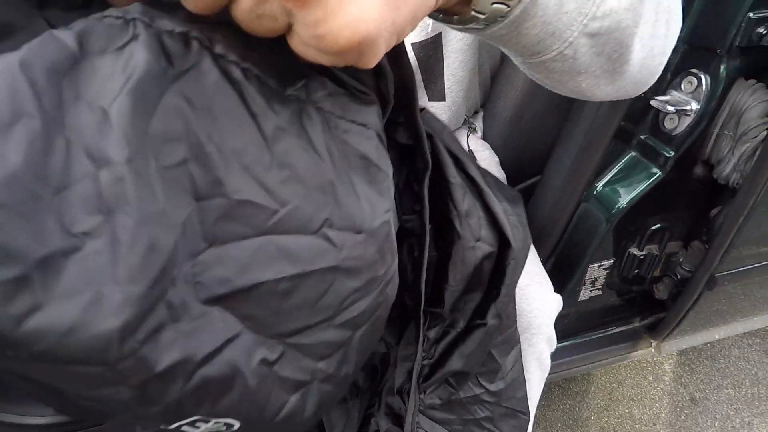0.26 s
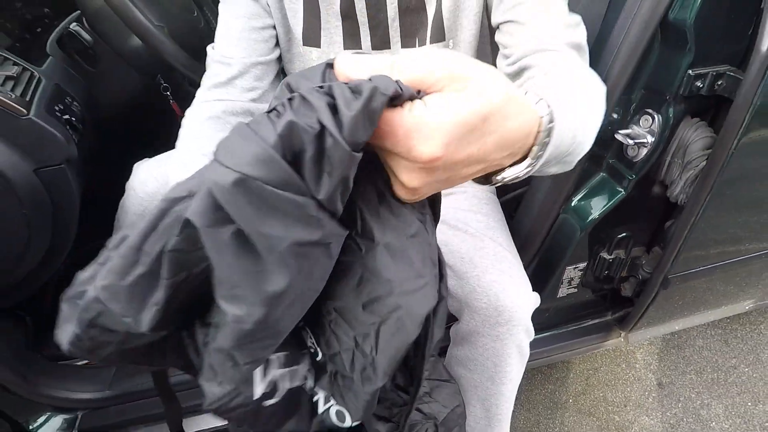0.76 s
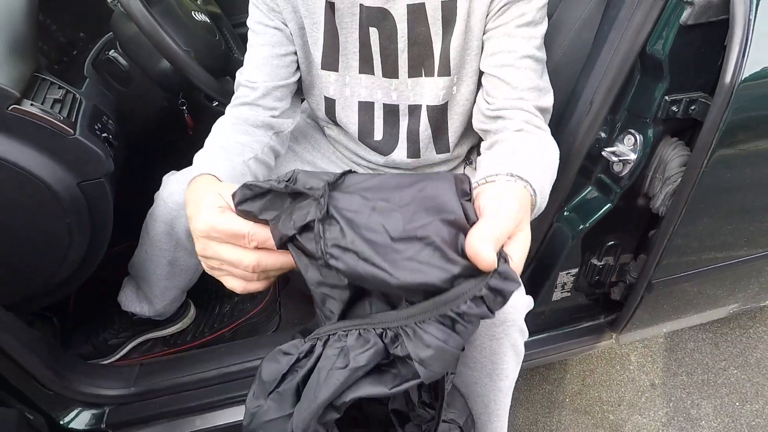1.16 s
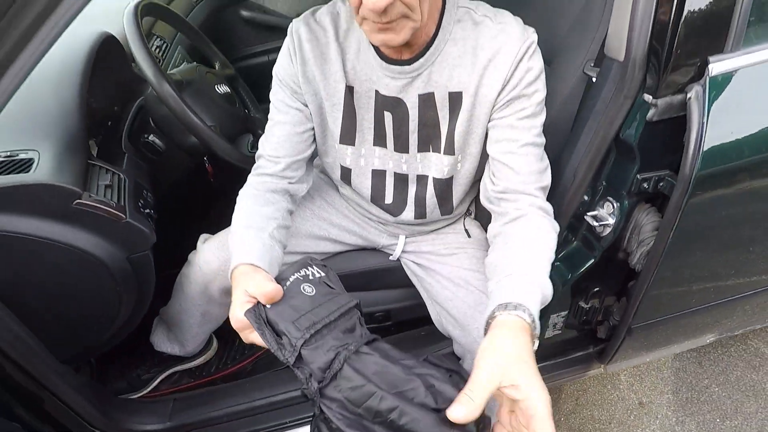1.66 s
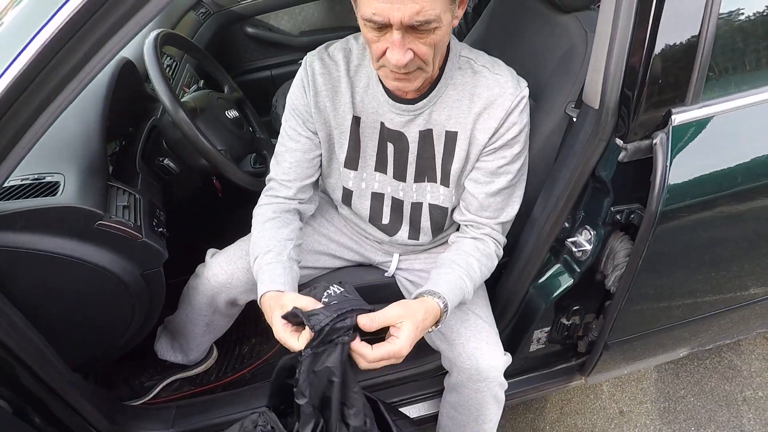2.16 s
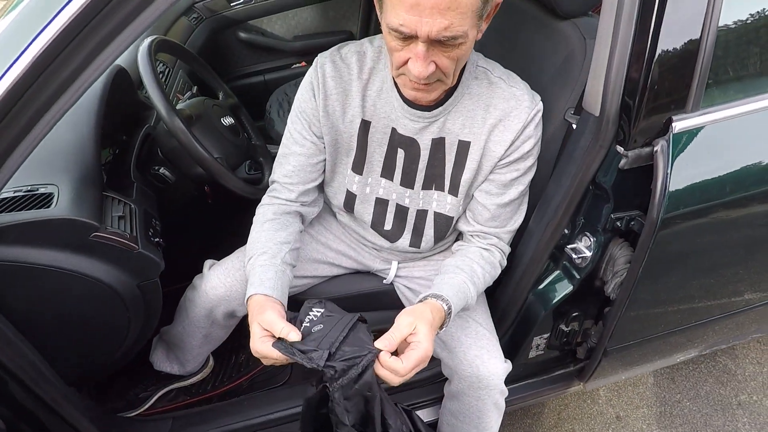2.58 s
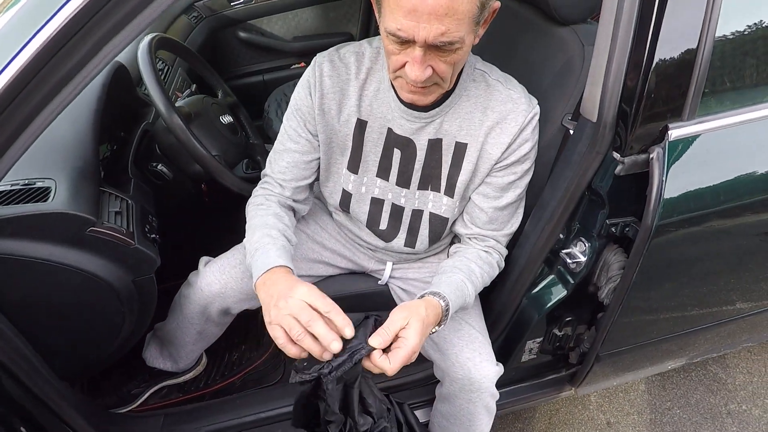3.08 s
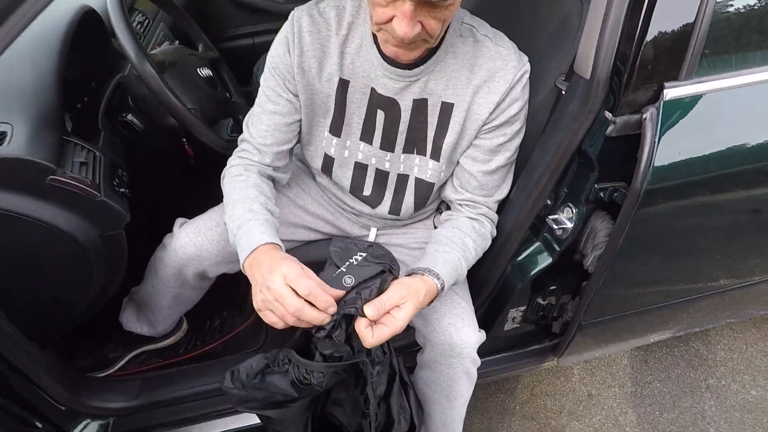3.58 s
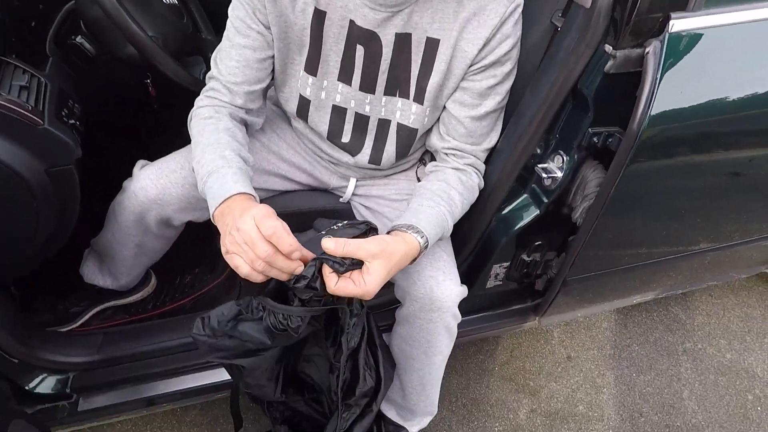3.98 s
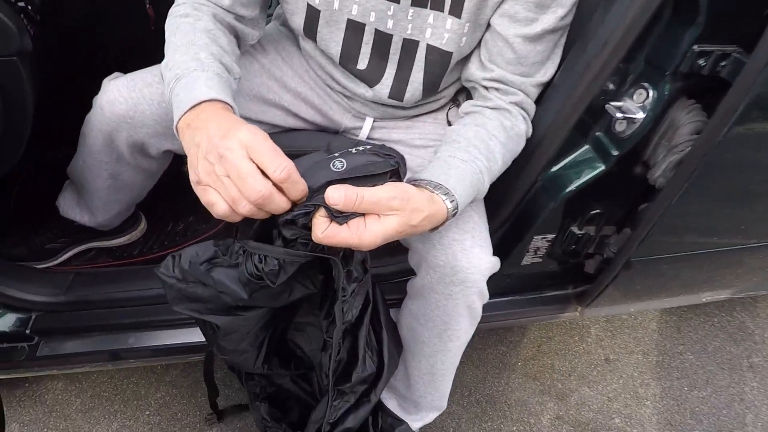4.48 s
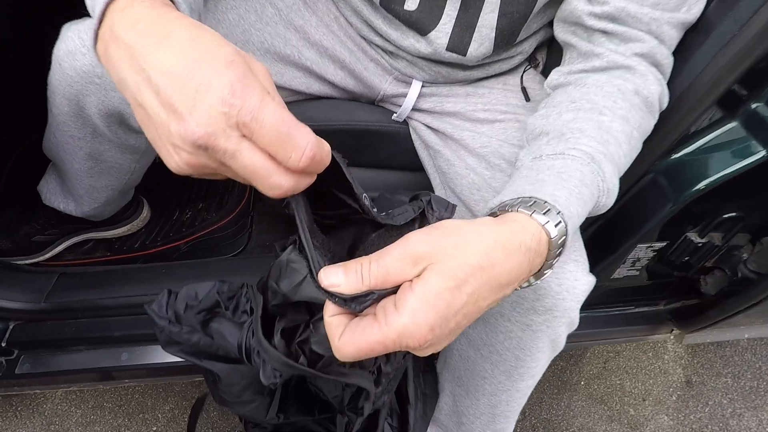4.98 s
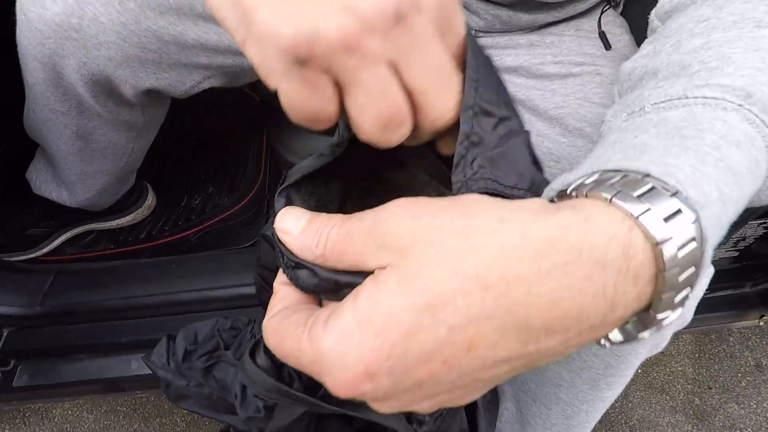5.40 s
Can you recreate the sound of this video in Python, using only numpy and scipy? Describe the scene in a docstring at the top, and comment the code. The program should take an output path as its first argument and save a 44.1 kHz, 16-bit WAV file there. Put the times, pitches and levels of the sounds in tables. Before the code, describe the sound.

Thin crinkly fabric is handled in quick strokes beside a parked car, with a brief zippy scrape, later plastic rasps and soft wind buffeting.

```python
"""At the open door of a parked car, a stiff nylon bag is folded and stuffed into its pouch, close to a camera.
Sliding cloth swishes as filtered friction noise with crackling grains, and its creases snap as damped modes.
Once the weave zips through a hand: a tone at the rate of its ribs. Later something catches and drags on the
camera's housing, as volleys of slips filtered by the shell's modes. Light wind rumbles and puffs on the
microphone, as slow noise and short fluttering swings of pressure, over a steady outdoor background."""
import sys
import numpy as np
from scipy.fft import rfft, irfft, next_fast_len
from scipy.io import wavfile
from scipy.ndimage import uniform_filter1d, map_coordinates

SR = 44100
rng = np.random.default_rng(int(sys.argv[2]) if len(sys.argv) > 2 else 0)


def generate_wav(sig):
    """Save sig (samples, or channels by samples) to the path in sys.argv[1] as 16-bit PCM at SR."""
    pcm = np.round(np.clip(np.atleast_2d(sig).T, -1, 1) * 32767).astype(np.int16)
    wavfile.write(sys.argv[1], SR, pcm)


N = 248794


def amp(db):
    """Logarithmic level: decibels to amplitude gain."""
    return 10 ** (np.asarray(db) / 20)


def unit(x):
    """Normalisation of mean power: scale to rms 1."""
    return x / np.sqrt(np.mean(x ** 2) + 1e-20)


def curves(rows):
    """Linear interpolation: one value per sample for each column after the time."""
    s, *cols = np.transpose(rows)
    return [np.interp(np.arange(N) / SR, s, c) for c in cols]


def during(rows):
    """Gating: open over the time span of a table, with edges softened by a moving average."""
    t = np.arange(N) / SR
    is_open = 1. * ((t > rows[0][0]) & (t < rows[-1][0]))
    return uniform_filter1d(is_open, size=200)


def wobble(rate):
    """Random modulation: a smooth curve through normal deviates, rate knots a second."""
    knots = rng.standard_normal(int(N * rate / SR) + 4)
    return map_coordinates(knots, [np.arange(N) * rate / SR])


def filtered(x, response):
    """Linear filtering: the spectrum of x times a complex response of frequency."""
    m = 2 * next_fast_len(len(x) // 2 + 4096)  # even length, padded for the filter's tail
    spectrum = rfft(x, m) * response(np.fft.rfftfreq(m, 1 / SR))
    return irfft(spectrum, m)[:len(x)]


def colour(x, points):
    """Minimum-phase filtering: a causal filter whose gain follows (f/Hz, level/dB) points."""
    f, db = np.transpose(points)

    def response(hz):
        cepstrum = irfft(np.log(amp(np.interp(np.log(hz + 1), np.log(f), db))))
        # folding the cepstrum onto positive time makes the filter causal
        cepstrum[1:len(hz) - 1] *= 2
        cepstrum[len(hz):] = 0
        return np.exp(rfft(cepstrum))
    return filtered(x, response)


def resonance(f, hz, width):
    """Damped oscillator: response of one mode, with gain 1 at its resonance."""
    return 1j * f * width / (hz * hz - f * f + 1j * f * width)


def grains(rate, spread_db):
    """Random point process: impulses, rate per second on average, of scattered size and sign, rms 1."""
    scatter_db = spread_db * np.clip(rng.standard_normal(N), -2, 2)
    sizes = amp(scatter_db) * np.sign(rng.standard_normal(N))
    return unit(sizes * (rng.random(N) < rate / SR))


def add(track, s, sound):
    """Superposition: mix a sound into a track at time s."""
    part = track[round(s * SR):][:len(sound)]
    part += sound[:len(part)]


def gesture(start, length, attack, release):
    """Exponential growth and decay: rises to its start, holds, dies away; attack, release in s per 20 dB."""
    t = np.arange(N) / SR - start
    before, after = np.maximum(-t, 0), np.maximum(t - length, 0)
    return np.exp(-np.log(10) * np.minimum(before / attack + after / release, 10))


# Hand strokes that slide cloth over cloth: start t/s, length t/s, mid-stroke level/dB,
# swell from start to end level/dB
STROKES = [(0, 0.18, -43, -11.5), (0.257, 0.095, -36.5, -0.5), (0.357, 0.091, -31, -1),
           (0.458, 0.12, -41, 1), (0.603, .18, -42, 3.5), (0.792, 0.3, -40, -3.5), (1.112, 0.18, -43, 8),
           (1.33, 0.073, -43, -7.5), (1.427, .26, -49.5, 4.5), (1.734, 0.17, -55.5, -4),
           (1.898, 0.17, -45.5, 2.5), (2.164, 0.068, -47, -0.5), (2.325, 0.33, -50.5, -6.5),
           (2.812, 0.029, -56.5, 7), (3.028, .1, -54, 2.5), (3.197, .12, -51.5, -11),
           (3.361, 0.14, -47, 0.5), (3.626, 0.28, -50, 1.5), (3.966, 0.046, -49.5, -4),
           (4.08, .21, -52.5, 6), (4.45, 0.18, -50, 10), (4.736, 0.064, -43.5, -7), (4.957, 0.042, -50, -1),
           (5.05, 0.346, -44.5, 4), (5.446, 0.21, -42, 6)]
STROKE_ATTACK_S, STROKE_RELEASE_S = .048, .09  # s per 20 dB


def sliding():
    """Power summation: the sliding effort adds the squares of all strokes, each swelling or fading."""
    t, power = np.arange(N) / SR, np.zeros(N)
    for start, length, db, swell_db in STROKES:
        progress = np.clip((t - start) / length, 0, 1) - .5
        envelope = gesture(start, length, STROKE_ATTACK_S, STROKE_RELEASE_S)
        power += (amp(db + swell_db * progress) * envelope) ** 2
    return np.sqrt(power)


# Gain of the treble, as the hiss brightens and dulls over time: t/s, level/dB
TREBLE_GAIN = [(0, -7.5), (.45, -2), (.85, -3.5), (1.3, 1), (2.8, 0), (5.1, 1), (5.6, -5)]
# Relative spectrum of rubbing threads: f/Hz, level/dB
HISS_SPECTRUM = [(1000, -33), (1900, -13.5), (2500, -3.5), (3100, -2.5), (3700, 0.5), (4200, -3),
                 (5000, -6), (6000, -8), (7200, -4.5), (8000, -9.5), (9000, -11), (10500, -18.5),
                 (12000, -28.5), (15500, -33)]
# Relative spectrum of the hollow bag, shared by the outdoor background: f/Hz, level/dB
BODY_SPECTRUM = [(150, -5.5), (300, 3), (600, 2.5), (900, 0), (1250, 0.5), (1900, -4.5), (2600, -8.5),
                 (5000, -50), (10000, -100)]
# hollow sound against the effort, and the steady level of the outdoor background (dB)
BODY_DB, AMBIENT_DB = -2.5, -51.5
# small creases that tick at random: rate per second, rms against the rubbing before it is filtered (dB)
TICK_RATE, TICK_DB = 14, -8


def swish():
    """Friction noise: threads hiss, tiny creases crackle in clumps; the bag's hollow sound joins the background."""
    effort = sliding()
    treble_db, = curves(TREBLE_GAIN)
    crackle = unit(grains(rate=1100, spread_db=6) * amp(2.5 * wobble(60)))
    rubbing = unit(rng.standard_normal(N) + 0.18 * crackle) * amp(1.33 * wobble(60))
    ticks = amp(TICK_DB) * grains(rate=TICK_RATE, spread_db=3)
    hiss = unit(colour(rubbing + ticks, HISS_SPECTRUM))
    treble = filtered(hiss, lambda f: 1 / (1 + (4600 / (f + 1)) ** 8))  # above about 4600 Hz
    hiss = hiss + (amp(treble_db) - 1) * treble
    body = unit(colour(rng.standard_normal(N) + 0.99 * crackle, BODY_SPECTRUM))
    body_level = np.hypot(amp(BODY_DB) * effort, amp(AMBIENT_DB))
    return effort * hiss + body_level * body


# Creases that buckle and folds that flap: t/s, peak level/dB before a common 4.5 dB cut, f/Hz,
# 60 dB decay of the driving noise t/s
SNAPS = [(0.2291, -16.5, 1030, 0.012), (.363, -12.5, 438, 0.09), (.384, -14.5, 1000, 0.024),
         (0.4175, -2, 4300, 0.0082), (.4429, -6.5, 3080, 0.014), (0.5628, -15, 4800, 0.011),
         (0.742, -17.5, 1200, 0.014), (.802, -19, 1390, 0.022), (0.83, -16, 930, 0.021),
         (.993, -21, 1900, .012), (1.295, -11, 2620, 0.019), (1.317, -20, 1190, 0.062),
         (1.391, -20.5, 1550, .02), (2.135, -22, 1350, 0.03), (2.181, -23.5, 2370, .02),
         (3.889, -20.5, 2140, 0.05), (3.981, -27, 546, 0.03), (4.221, -24.5, 1390, 0.026),
         (5.117, -21.5, 1680, 0.021), (5.447, -22.5, 2950, .015), (5.563, -17, 2940, .025)]
SNAP_WIDTH = 1.2  # bandwidth of each resonance, as a multiple of its pitch


def snaps():
    """Impulsive excitation of a damped mode: a crease flips with a crack and shakes a small panel of cloth."""
    out, t = np.zeros(N), np.arange(SR // 10) / SR
    for s, db, hz, t60 in SNAPS:
        flutter = rng.standard_normal(len(t)) * amp(-60 * t / t60)
        # the mode acts twice; the treble rolls off near 9500 Hz
        snap = filtered(flutter, lambda f: resonance(f, hz, SNAP_WIDTH * hz) ** 2 / (1 + (f / 9500) ** 8))
        add(out, s, amp(db - 4.5) * snap / np.abs(snap).max())
    return out


# Ribs of the weave passing the hand: t/s, mean rib rate f/Hz, level/dB before a common 2 dB cut
RIBS = [(.44, 1742, -41), (.452, 1710, -35), (.461, 2380, -32), (.479, 2317, -29.5), (.495, 1816, -38),
        (.506, 1515, -35), (.518, 1150, -34), (.535, 757, -39), (.56, 507, -62)]


def weave_zip():
    """Periodic excitation: ribs sing unevenly at the sliding speed, which falls as the pull ends."""
    rib_hz, db = curves(RIBS)
    uneven_hz = rib_hz * (1 + .11 * wobble(1500))
    phase = 2 * np.pi * np.cumsum(uneven_hz) / SR
    level = amp(db - 2 + 2.7 * wobble(260))
    return during(RIBS) * level * unit(np.sin(phase) + 0.26 * np.sin(2 * phase))


# Modes of the plastic shell: f/Hz, bandwidth f/Hz, level/dB
SHELL_MODES = [(424, 12, -15), (483, 30, -9.5), (632, 77, -0.5), (720, 19, 2), (880, 78, -9.5),
               (1104, 64, -2.5), (1380, 23, 2.5), (1820, 68, -2.5), (2360, 40, 2), (2750, 28, -7),
               (3040, 14, 6), (3295, 150, -4.5), (3840, 31, -2), (4220, 120, -20), (7180, 400, -16),
               (8300, 350, -26)]
# Relative spectrum of rasping slips: f/Hz, level/dB
RASP_SPECTRUM = [(900, -38.5), (2000, -8), (2900, -3), (3500, 3), (4100, 3), (5000, -1.5), (6000, -1.5),
                 (7300, -0.5), (8700, -4), (10000, -16), (12000, -24), (15000, -26), (16000, -33)]
# Relative spectrum of knocks on the shell: f/Hz, level/dB
KNOCK_SPECTRUM = [(100, -8), (250, 5.5), (450, 0), (650, -1), (820, -5.5), (1250, 0), (1900, -6.5),
                  (2700, -7), (6000, -57), (12000, -52)]


def housing(x, spectrum):
    """Modal superposition: slips heard through the camera's plastic shell, directly and by its modes."""
    def shell(f):
        return .6 + sum(amp(db) * resonance(f, hz, width) for hz, width, db in SHELL_MODES)
    return colour(filtered(x, shell), spectrum)


# Short catches on the housing: t/s, rasp peak level/dB before a common 3 dB cut,
# knock rms against the rasp's level/dB before a common 4 dB boost
CATCHES = [(4.566, -16, -13), (4.588, -19, -16), (4.6, -13.5, -9), (4.62, -13.5, -10.5), (4.633, -19, -1),
           (4.654, -26, -5), (4.745, -7, -12), (4.753, -20.5, -2), (4.8127, -9, -9), (4.82, -11, -20),
           (4.833, -7, -15), (4.84, -11.5, -12), (4.864, -9.5, -4.5), (4.875, -8.5, -9), (4.918, -14, -2),
           (4.95, -25, 4), (5.288, -18.5, 3), (5.295, -15.5, 8.5), (5.31, -18.5, 4), (5.3215, -12.5, 2),
           (5.339, -14.5, -9), (5.612, -18, 0.5)]
CATCH_RISE_S, CATCH_T60_S = .009, 0.027  # build-up and decay, s per 60 dB


def catches():
    """Stress release: each catch builds up briefly, then lets go in a dying volley of tiny slips."""
    out, t = np.zeros(N), np.arange(SR // 10) / SR - .02  # room for the build-up before t = 0
    slips = grains(rate=7000, spread_db=4)
    strength = amp(np.minimum(60 * t / CATCH_RISE_S, -60 * t / CATCH_T60_S))
    for s, db, knock_db in CATCHES:
        volley = np.roll(slips, -round(s * SR))[:len(t)] * strength
        rasp = unit(housing(volley, RASP_SPECTRUM))
        knock = unit(housing(volley, KNOCK_SPECTRUM))
        catch = rasp + amp(knock_db + 4) * knock
        # the strength peaks about 1 ms after the listed time
        add(out, s + t[0] + 0.000983, amp(db - 3.0) * catch / np.abs(rasp).max())
    return out


# Drags across the housing: start t/s, length t/s, rasp level/dB, knock level/dB
DRAGS = [(4.81, 0.043, -29.5, -54), (4.861, 0.01, -17.5, -24.5), (4.884, 0.046, -25, -21),
         (4.935, .018, -36, -34), (5.056, 0.021, -40, -41.5), (5.145, .03, -36, -57),
         (5.289, 0.046, -30.5, -30.5), (5.598, 0.03, -40, -47)]
DRAG_ATTACK_S, DRAG_RELEASE_S = 0.008, 0.016  # bite and letting go, s per 20 dB


def drags():
    """Stick-slip friction at an uneven rate: fine and coarse slips rasp, coarse ones knock the shell."""
    coarse = grains(rate=900, spread_db=3)
    fine = grains(rate=3500, spread_db=4)
    rasp = unit(housing(coarse + 2.8 * fine, RASP_SPECTRUM))
    knock = unit(housing(coarse, KNOCK_SPECTRUM))
    # the contact tightens and slackens
    grip = unit(amp(1.8 * wobble(220)))
    out = np.zeros(N)
    for start, length, rasp_db, knock_db in DRAGS:
        contact = amp(rasp_db) * rasp + amp(knock_db) * knock
        out += gesture(start, length, DRAG_ATTACK_S, DRAG_RELEASE_S) * contact
    return grip * out


# Puffs of air that flutter in the port: t/s at the middle, gain level/dB, nominal flutter f/Hz
PUFFS = [(.37, -17, 215), (0.85, -29.5, 202.4), (3.59, -33, 160), (3.634, -19, 101.6), (3.988, -17, 190),
         (4.44, -16.5, 150), (4.475, -22, 200), (4.521, -21, 189.6), (4.544, -13.5, 126.4),
         (4.789, -16.5, 91.3), (4.974, -21.5, 189.6), (4.997, -12.5, 124.6), (5.032, -23, 106),
         (5.261, -21.5, 128), (5.616, -21, 129.2)]
# spread of the swell (s, standard deviation), and the slower push under it (Hz, dB re flutter)
PUFF_HALF_S, PUSH_HZ, PUSH_DB = .009, 75.4, -2


def puffs():
    """Vortex passage: an eddy swells with uneven swings of pressure, riding on a slower push of air."""
    out, t = np.zeros(N), np.arange(SR // 5) / SR - .1
    swell = np.exp(-.5 * (t / PUFF_HALF_S) ** 2)
    for s, db, hz in PUFFS:
        # the pitch wavers and falls as the eddy passes
        rate = hz * np.exp(.25 * np.tanh(wobble(220)[:len(t)]) - .18 * np.tanh(t / PUFF_HALF_S))
        phase = 2 * np.pi * (np.cumsum(rate) / SR + rng.random())
        flutter = np.sin(phase) + .14 * np.sin(2 * phase)
        push = amp(PUSH_DB) * np.sin(2 * np.pi * (PUSH_HZ * t + rng.random()))
        add(out, s + t[0], amp(db) * (swell * flutter + np.sqrt(swell) * push))
    return out


def buffeting(spectrum, steady_s):
    """Turbulence noise: low noise whose strength stays even over spans longer than steady_s."""
    x = colour(rng.standard_normal(N), spectrum)
    return x / np.sqrt(np.abs(uniform_filter1d(x * x, int(steady_s * SR))) + 1e-12)


# Strength of the wind at the port: t/s, rumble level/dB before gusting and a common 1 dB boost
WIND = [(0.0, -17.5), (0.28, -24), (0.36, -20.0), (0.52, -26), (1.04, -25), (1.16, -24), (1.36, -29.5),
        (1.56, -25), (3.23, -27), (3.31, -25), (4.23, -21), (4.31, -27.5), (4.43, -19.5), (5.03, -24.5),
        (5.11, -26.5), (5.47, -20), (5.55, -29), (5.63, -23.5)]
# Relative spectrum of the slow pressure swings: f/Hz, level/dB
RUMBLE_SPECTRUM = [(8, -9.5), (20, 7.5), (32, 3.5), (50, -3), (80, -6.5), (110, -14.5), (160, -29),
                   (300, -72), (1500, -120)]
# Relative spectrum of the smaller eddies: f/Hz, level/dB
EDDY_SPECTRUM = [(50, -11.5), (90, 2.5), (130, 1), (200, -7.5), (300, -13), (450, -21), (900, -58.5),
                 (4000, -120)]
# Relative spectrum of the open air's hiss: f/Hz, level/dB
AIR_SPECTRUM = [(200, -45), (1000, 0), (4000, 0), (9000, -3.5), (12000, -10.5), (15500, -22)]
# eddies against the tabled rumble (dB), and how much faster they grow than it (dB per dB)
EDDY_DB, EDDY_GROWS = -14, 0.067
GUST_DB, AIR_DB = 1.57, -58.5  # depth of the quick gusting, rms of the air's hiss


def wind():
    """Turbulent pressure: slow swings at the port, smaller eddies that grow with them, and a faint even hiss."""
    rumble_db, = curves(WIND)
    gust_db = GUST_DB * wobble(12)
    rumble = amp(rumble_db + gust_db + 1.0) * buffeting(RUMBLE_SPECTRUM, steady_s=0.107)
    growth_db = EDDY_GROWS * (rumble_db - rumble_db.mean())
    eddy_db = rumble_db + EDDY_DB + growth_db + .5 * gust_db
    eddies = amp(eddy_db) * buffeting(EDDY_SPECTRUM, steady_s=0.12)
    air = amp(AIR_DB) * unit(colour(rng.standard_normal(N), AIR_SPECTRUM))
    return rumble + eddies + air


def scene():
    """Linear superposition: cloth, contact noise and wind at one microphone."""
    cloth = swish() + snaps() + weave_zip()
    contact = catches() + drags()
    return (cloth + contact + puffs() + wind())[None]


TOP_HZ = 15500  # band limit


def record(dry):
    """Saturation and band limiting: the camera rounds off the highest peaks and drops all above TOP_HZ."""
    rounded = dry[0] / (1 + (dry[0] / .7) ** 6) ** (1 / 6)
    return filtered(rounded, lambda f: f < TOP_HZ)[None]


dry = scene()
out = record(dry)
generate_wav(out)
```